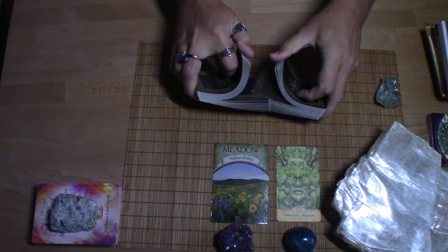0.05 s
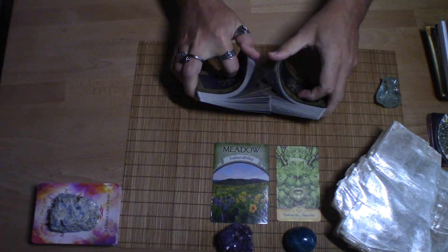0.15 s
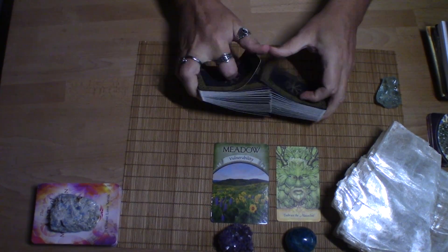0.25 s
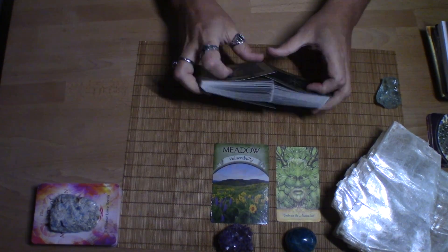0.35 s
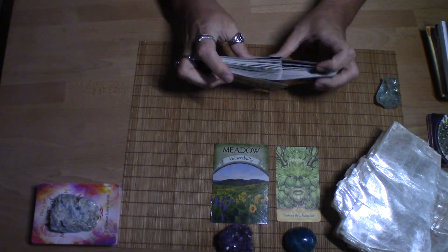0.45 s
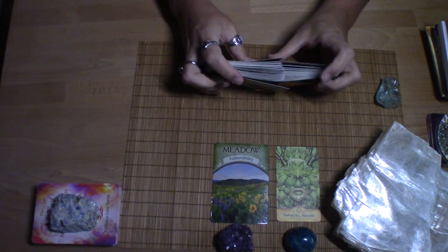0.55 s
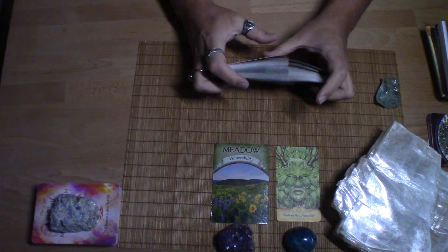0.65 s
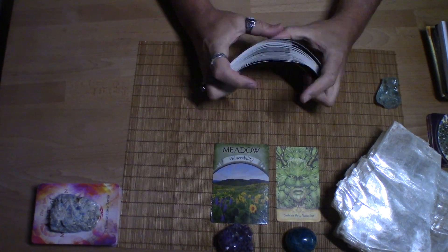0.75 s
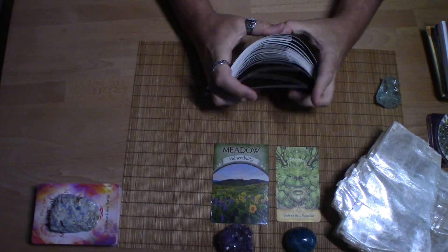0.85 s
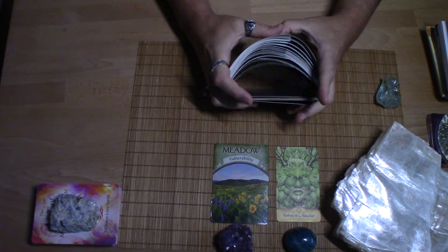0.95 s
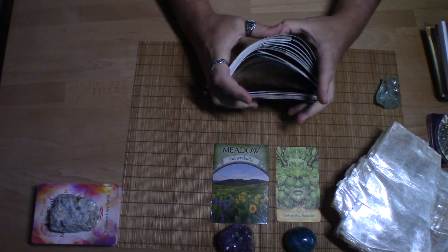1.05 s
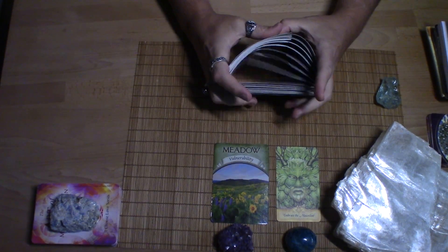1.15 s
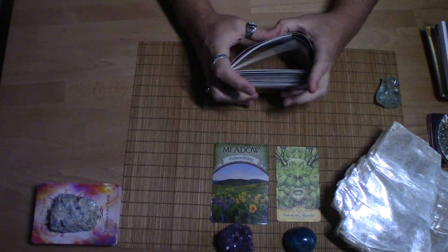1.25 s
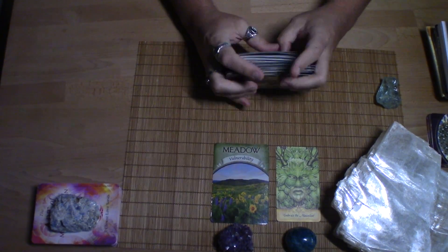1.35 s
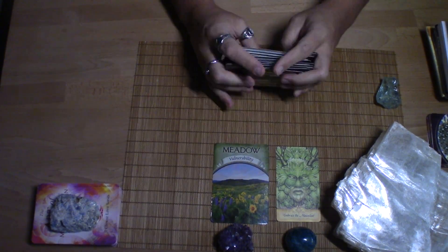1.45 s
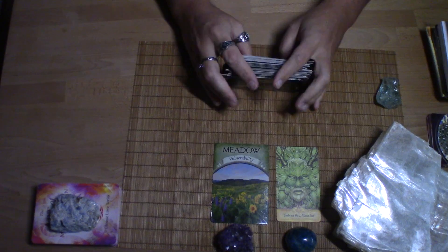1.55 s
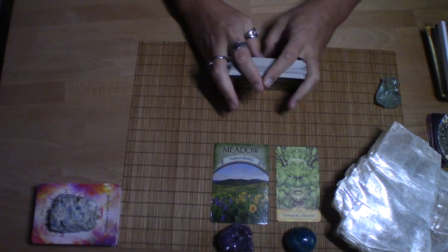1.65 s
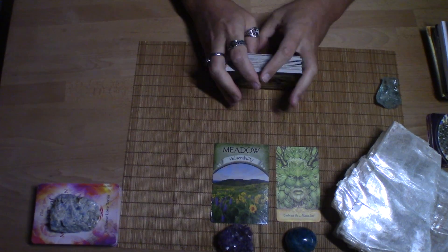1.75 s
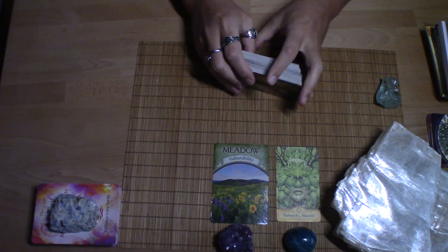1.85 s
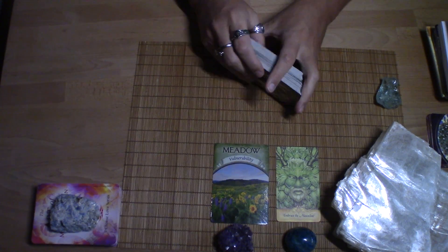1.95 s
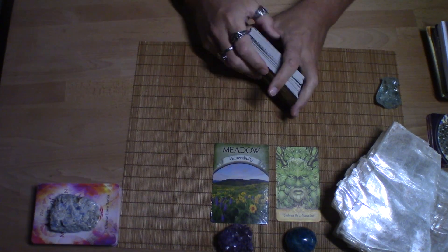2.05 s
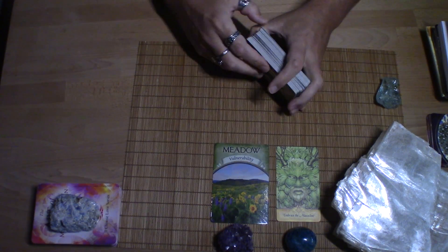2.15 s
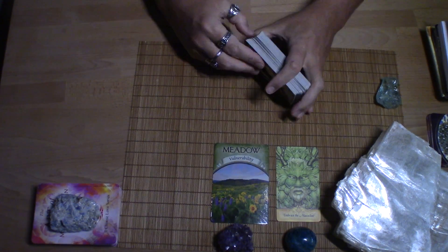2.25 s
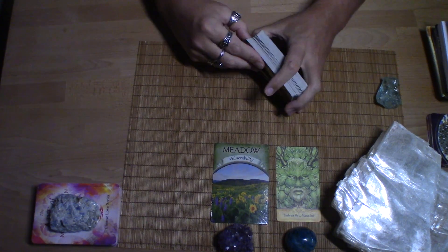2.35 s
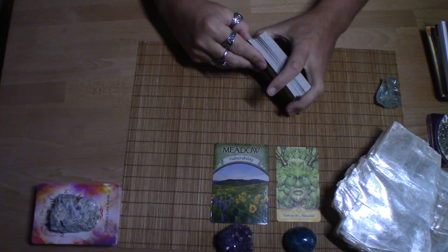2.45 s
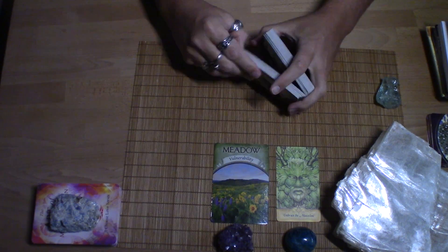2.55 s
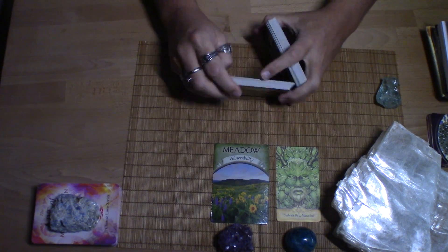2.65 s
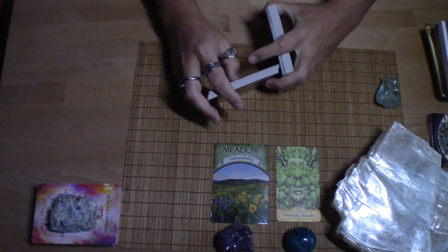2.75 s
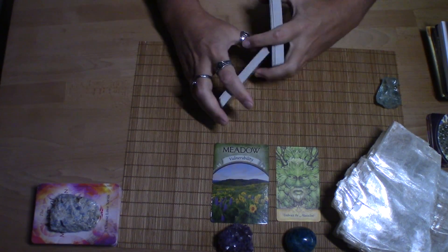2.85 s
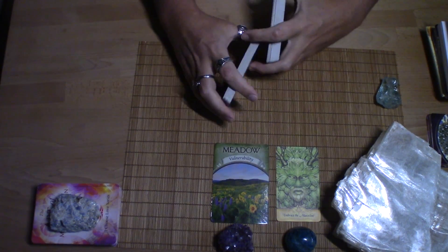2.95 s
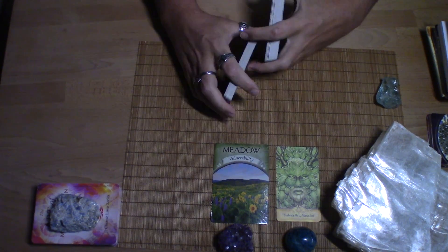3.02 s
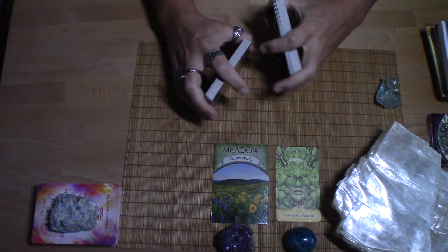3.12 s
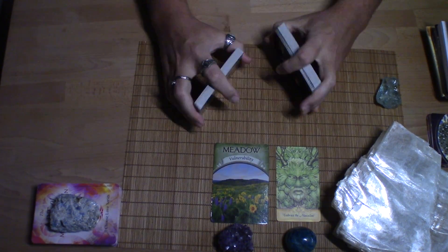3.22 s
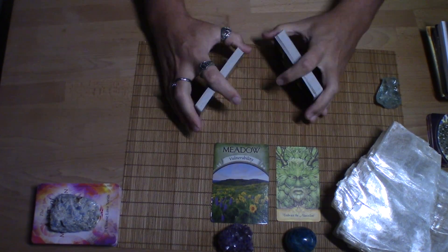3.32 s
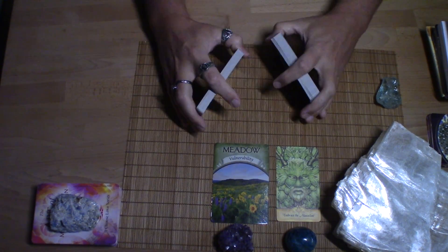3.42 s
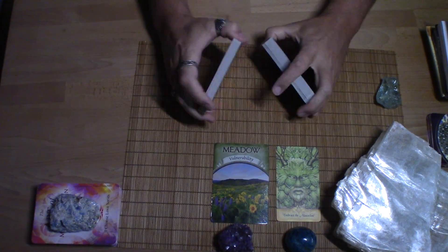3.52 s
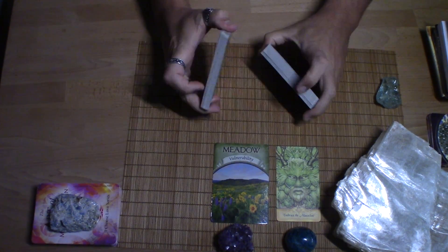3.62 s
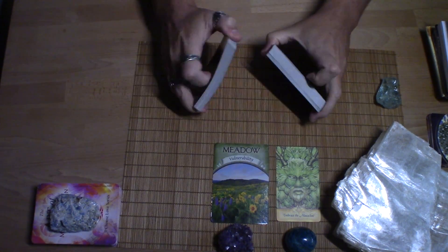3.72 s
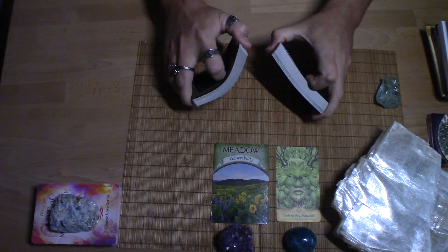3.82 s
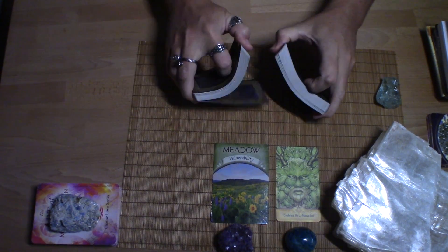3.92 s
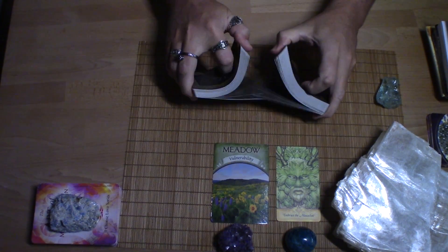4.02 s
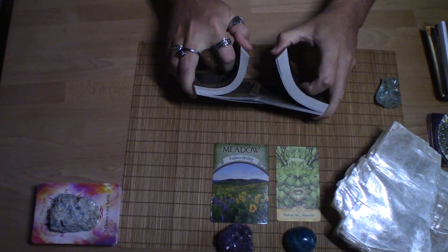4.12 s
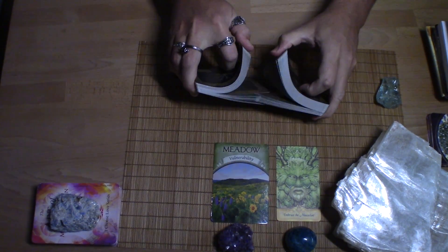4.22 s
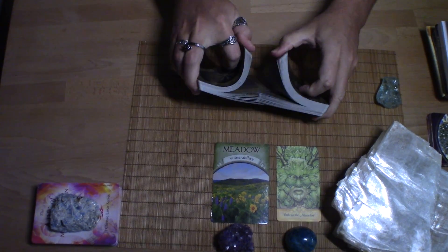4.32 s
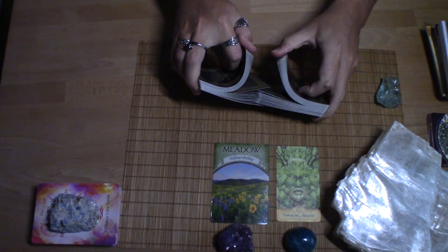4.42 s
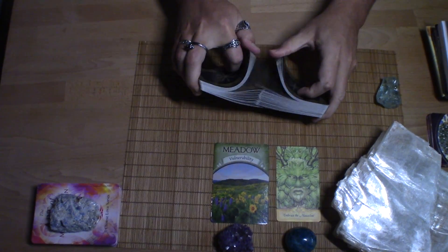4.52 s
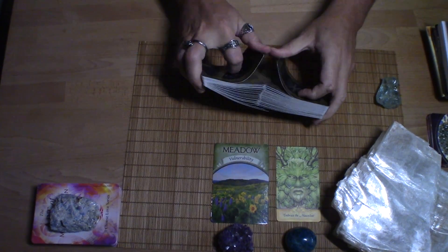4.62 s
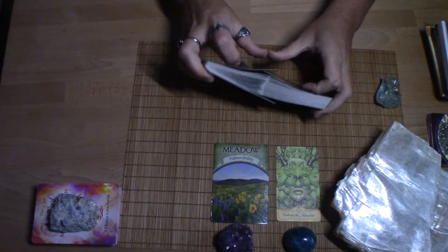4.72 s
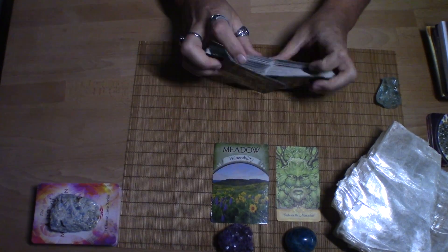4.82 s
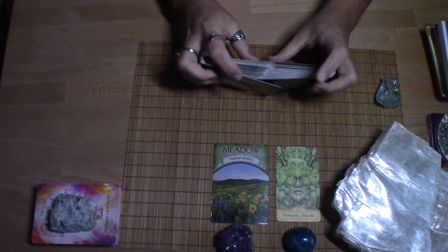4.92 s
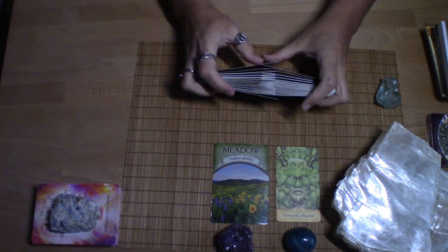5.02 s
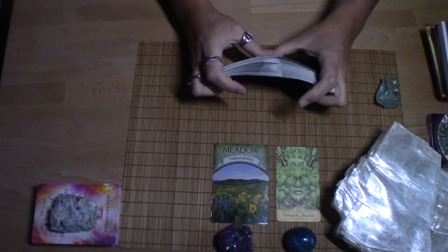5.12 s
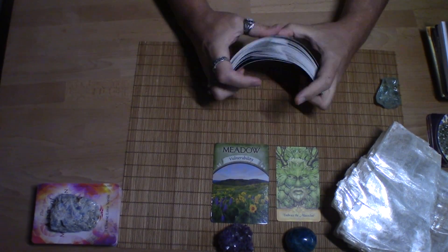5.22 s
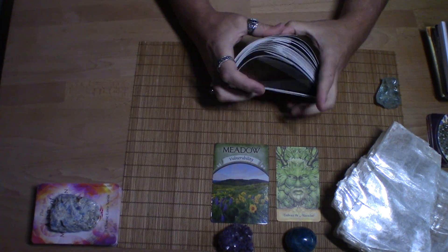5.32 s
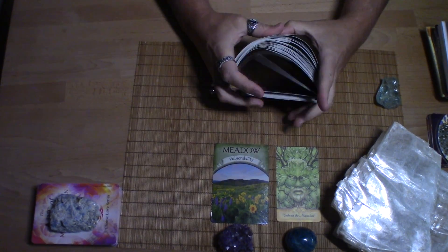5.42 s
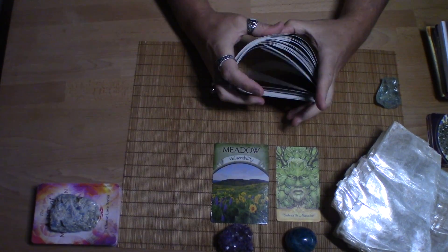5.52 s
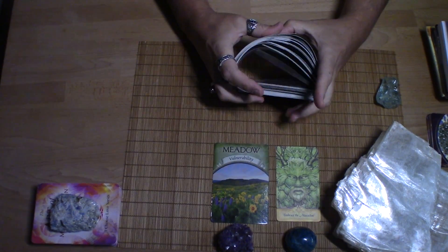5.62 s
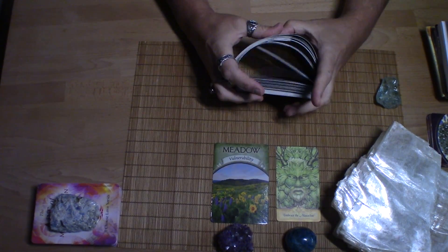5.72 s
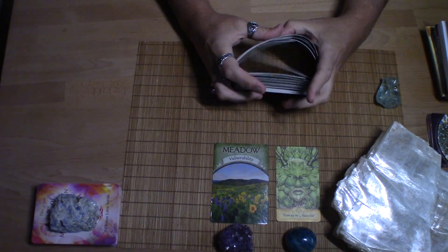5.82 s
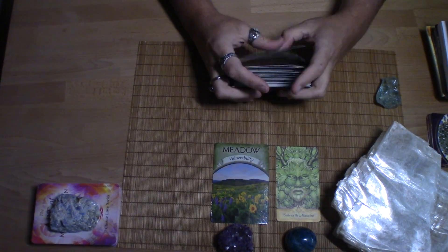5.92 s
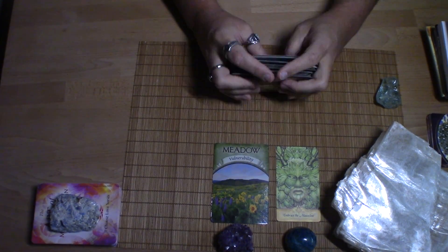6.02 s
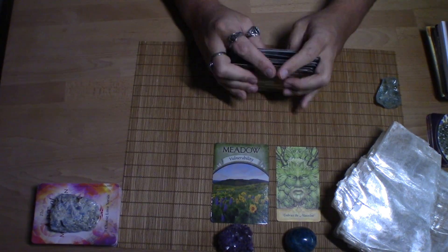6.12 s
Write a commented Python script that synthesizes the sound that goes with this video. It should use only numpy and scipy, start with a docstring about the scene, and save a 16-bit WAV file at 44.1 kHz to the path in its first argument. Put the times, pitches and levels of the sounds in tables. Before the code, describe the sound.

A stiff card deck riffles in a loud crackling flutter, cascades flat, gets squared with soft wooden knocks, then riffles and cascades again up close.

```python
"""A deck of stiff cards on a mat over a hollow wooden table: thumbs riffle two halves together, the bent
deck cascades flat in a bridge, then it is squared up with knocks, rubs and presses; riffle and bridge recur.
Snaps are noise bursts ringing card modes; sliding faces are shaped noise; edges and squeezed air are grains.
Knocks ring table modes over low rumble and room tone. The table top mirrors faces and snaps into a close
microphone, whose limiter holds the loud runs down."""
import sys
import numpy as np
from scipy import signal
from scipy.fft import rfft, irfft, next_fast_len
from scipy.io import wavfile
from scipy.ndimage import uniform_filter1d

SR = 44100
rng = np.random.default_rng(int(sys.argv[2]) if len(sys.argv) > 2 else 0)


def output_pcm(signal):
    """Save a mono or channel-first signal as 16-bit PCM at the path in sys.argv[1].

    Samples are clipped to [-1, 1] before scaling.
    """
    pcm = np.clip(np.atleast_2d(signal).T, -1, 1) * 32767
    wavfile.write(sys.argv[1], SR, np.round(pcm).astype(np.int16))


N = 272185
CONTROL_STEP = 32   # samples between points of the move envelopes

# Low rumble: t/s, rms level/dB
RUMBLE_LEVELS = [(0.0, -39), (0.41, -40), (1.2, -21), (1.22, -33), (2.32, -43), (2.52, -29), (3.14, -46),
                 (3.21, -36), (3.61, -48), (3.76, -24), (4.88, -37), (4.97, -55), (5.02, -25), (5.19, -45),
                 (5.38, -26), (5.81, -27), (6.1, -42), (6.17, -30)]
# Room tone spectrum: f/Hz, relative level per Hz/dB
ROOM_TONE_SPECTRUM = [(35, -46), (60, -24), (189, -2), (262, -12.5), (566, -15.5), (862, -16.5),
                      (1280, -14), (2710, -21.5), (11000, -23), (16000, -31)]
ROOM_TONE_RMS_DB = -48.0
# Room echo: decay of the lows, corner of the loss per round, gain
ROOM_T60_S, WALL_CORNER_HZ, ROOM_GAIN_DB = 0.2, 4200, -16.5
MIRROR_DELAY_S, MIRROR_GAIN = 0.000563, 0.11
# Table modes: f/Hz, relative level/dB, t60/s
TABLE_MODES = [(112.2, -7.5, 0.12), (176.6, -4.5, 0.21), (213.8, -6.5, 0.2), (269.5, -5.5, 0.068),
               (328, -8, 0.067), (414.4, -9, 0.056), (588, -12, 0.041)]
# Deck on table: t/s, relative strength/dB
TABLE_KNOCKS = [(0.437, -10.5), (0.618, -24), (0.754, -13), (1.436, -14), (1.464, -1.5), (1.496, -20),
                (1.623, -27), (1.671, -14), (1.753, -24), (1.819, -10), (2.716, 2), (2.738, -7),
                (2.805, -22), (3.219, 5), (3.242, 0), (3.275, -2), (3.965, -6), (4.879, -22), (4.913, -8.5),
                (5.001, -11), (5.033, -22), (6.145, -3.5)]

# Palms and deck press on the mat: t/s, swell/s per 20 dB, fade/s per 20 dB, relative level/dB
PRESS_MOVES = [(0.545, 0.13, .15, -26), (0.62, .015, 0.13, -19), (0.79, 0.18, 0.075, -21),
               (1.44, .01, .2, -23), (1.51, .1, .2, -17), (1.666, 0.17, 0.12, -15), (1.755, .01, .2, -25),
               (1.83, 0.19, .2, -14.5), (1.994, 0.35, 0.055, -19), (2.1, 0.085, 1, -32.5),
               (2.23, .03, .05, -33), (2.729, 0.023, 0.28, -14), (2.962, 0.26, 0.084, -26),
               (3.255, .06, .08, -12.5), (3.682, 0.048, 0.27, -31), (4.86, 0.088, 0.48, -26.5),
               (5.008, 0.057, 0.13, -17), (5.27, 0.018, .1, -30), (5.403, 0.095, 0.093, -16),
               (6.172, 0.018, .05, -12)]
# Fingertips rub along the card edges: t/s, swell/s per 20 dB, fade/s per 20 dB, relative level/dB
RUB_MOVES = [(2.3, .02, .2, -45), (2.63, .05, .06, -40), (2.84, .06, .05, -35), (2.97, .06, .07, -33),
             (3.53, .1, .09, -39), (3.7, .04, .12, -38), (5.04, .08, .08, -33), (5.17, .01, .4, -30)]
# Card faces slide over each other: t/s, swell/s per 20 dB, fade/s per 20 dB, relative level/dB
SLIDE_MOVES = [(0.43, 0.038, 0.07, -28), (0.555, 0.036, 0.14, -30.5), (0.63, .03, .1, -36),
               (0.695, .03, 0.045, -34.5), (0.745, .02, .05, -33), (0.801, 0.083, 0.33, -24),
               (0.88, 0.094, 0.04, -17), (1.666, 0.16, 0.032, -32), (1.9, 0.19, 0.21, -34.5),
               (1.994, 0.21, 0.072, -34.5), (2.06, .02, 0.32, -43.5), (2.752, .04, .1, -38),
               (3.055, .01, .03, -46), (3.245, .03, .08, -45), (2.962, 0.075, 0.12, -42),
               (3.44, .06, 0.16, -50), (3.512, .15, .14, -45.5), (3.898, .003, .02, -28),
               (4.707, .004, .09, -17), (4.816, .005, 0.052, -30), (4.98, 0.15, 0.35, -38.5),
               (5.257, 0.067, 0.044, -23), (6.002, .03, .1, -33.5), (6.125, 0.077, 0.074, -43)]
# Several cards drop together: t/s, swell/s per 20 dB, fade/s per 20 dB, relative level/dB
CLUMP_MOVES = [(0.028, .04, .05, -11.5), (0.9, 0.013, 0.64, -19), (1.145, .03, .1, -14),
               (1.24, .2, 0.067, -15), (1.339, 0.036, 0.072, -17), (1.516, .07, 0.074, -16.5),
               (1.67, .05, .05, -24), (1.825, .06, .08, -24), (2.46, .015, 0.046, -40.5),
               (2.718, .005, .06, -26), (3.245, .03, .07, -30), (3.921, .006, .04, -8),
               (3.972, .03, .05, -11), (4.0, .04, 0.38, -15), (4.527, 0.32, 0.09, -11.5),
               (5.402, 0.096, 0.12, -11.5), (5.869, 0.12, 0.04, -11.5), (5.95, 0.027, 0.068, -20.5),
               (6.148, .004, .1, -18), (6.165, .03, .1, -11)]
# The bent deck cascades flat: start/s, end/s, relative level/dB
BRIDGE_RUNS = [(0.889, 1.341, -13), (5.28, 5.949, -12)]
# Thumbs let the two halves run together: start/s, end/s, relative level/dB
RIFFLE_RUNS = [(-0.05, 0.323, -17.8), (3.96, 4.70, -19.3)]
# Swell and fade times, per 20 dB
BRIDGE_RISE_S, BRIDGE_FALL_S = 0.0079, 0.048
RIFFLE_RISE_S, RIFFLE_FALL_S = 0.035, 0.079
# Drive over the move's level: (sliding hiss, edge flutter, squeezed air, shaken table)
PRESS_MIX_DB = (-23, -13, -9, -1)
RUB_MIX_DB = (-16, 3, -13, -13)
SLIDE_MIX_DB = (1, -4.5, -19, -11)
CLUMP_MIX_DB = (-15.5, 0, 3, -8.5)
BRIDGE_MIX_DB = (-0.5, -9.5, -9.5, -13)
RIFFLE_MIX_DB = (-0.5, 3, -4, -8)

# Squeezed air spectrum: f/Hz, relative level per Hz/dB
AIR_SPECTRUM = [(150, -6), (270, -0.5), (350, 7), (450, -3), (600, 1.5), (750, -3.5), (950, -20.5),
                (1400, -30)]
# Edge flutter spectrum: f/Hz, relative level per Hz/dB
FLUTTER_SPECTRUM = [(700, -6.5), (1000, -4), (1250, 3), (1700, 4.5), (2400, 2), (3300, 1), (4500, -6),
                    (9000, -30), (15000, -50)]
# Sliding hiss spectrum: f/Hz, relative level per Hz/dB
SLIDE_SPECTRUM = [(1760, -17), (3000, -5), (5560, -1.5), (6620, 0.5), (8280, -2), (11800, -2),
                  (14500, -12.5), (16000, -23)]
# Card modes: multiple of slap pitch, relative level/dB, t60/s
CARD_MODES = [(1, 8.5, 0.0092), (1.32, -5, 0.0086), (.76, -10, 0.0047), (1.9, -10, 0.0058)]
# Clearest card corners snapping: t/s, relative slap level/dB, slap f/Hz, relative bright crack level/dB
CLEAR_SNAPS = [(0.023, 2, 2890, -3), (0.0438, 6, 2870, -6), (0.0581, 0, 1700, -16), (0.0847, 9, 1810, -1),
               (0.0901, 5, 1680, -32), (0.1137, 0.5, 3020, -14), (0.1258, 0, 1780, -20),
               (0.136, 7, 4560, -1), (0.1547, 3, 2800, -5), (0.1648, 4, 3030, -3), (0.178, -4, 1680, -8),
               (0.196, -7, 1860, -14), (0.2244, -8, 1530, -11), (0.2476, -3.5, 2150, -8),
               (0.2584, -2, 3030, -12), (0.2775, 3, 2850, -2), (0.4219, -10.5, 2940, -16),
               (0.429, -8, 3150, -11), (0.4454, -14, 2840, -20), (0.615, -16, 1270, -39),
               (0.636, -16, 1620, -47), (0.9021, -3, 1510, -10), (1.012, -4, 1720, -14),
               (1.0442, 3.5, 4150, -7), (1.1074, -5, 1710, -8), (1.1378, 5, 1340, -32),
               (1.187, 5.5, 1540, -10), (1.2005, -2, 1860, -26), (1.2201, 7, 2080, -18),
               (1.2365, 6, 1580, -11), (1.2494, 4.5, 1460, -12), (1.2803, 6.5, 1570, -10),
               (1.4636, -13, 1220, -45), (1.4985, 0.5, 1770, -39), (1.5408, -9, 1970, -44),
               (1.6683, -8.5, 1150, -30), (1.8197, -8.5, 1230, -50), (2.2775, -26, 3930, -48),
               (2.7176, -18, 1860, -37), (2.7567, -15, 1560, -23), (3.1753, -38, 3500, -38),
               (3.243, -15.5, 1540, -40), (3.898, -11, 1280, -18.5), (3.9169, 10, 1630, -14),
               (3.9482, -8, 1240, -14), (3.9688, 4, 1590, -27), (3.9751, 5, 1270, -6), (3.9908, 0, 1700, 1),
               (4.0235, 8, 3300, -6), (4.0604, -9, 1610, -5.5), (4.0954, 5, 2760, -3), (4.117, 0, 1760, -5),
               (4.1264, -7, 2210, -6.5), (4.1554, 6, 1760, -4), (4.1764, -10, 1930, -7),
               (4.1926, -6, 3040, -7), (4.227, 1, 1700, -9.5), (4.2444, 0, 1590, -3),
               (4.255, -0.5, 2960, -7), (4.2802, -11, 2900, -12), (4.2926, -11, 1560, 0),
               (4.331, 2, 1770, -7), (4.3714, -3, 4250, -7), (4.3768, 5, 3380, -6), (4.4084, 3, 1940, 0.5),
               (4.4484, 3, 1610, -6), (4.464, 2, 1800, -4.5), (4.485, 1.5, 1620, -12),
               (4.5192, -3, 1830, -9), (4.5314, -4, 1480, -10), (4.5404, -2, 1790, -7),
               (4.5592, -2, 3140, -2), (4.586, -8, 1660, -9), (4.6293, -2, 1820, -2.5),
               (4.6588, 2, 4400, -10), (4.6644, 4.5, 2180, -4), (4.7055, 3, 1780, -1),
               (4.7654, -21, 4100, -18), (4.816, -11, 3230, -21), (5.1026, -21.5, 1700, -28),
               (5.1683, -4, 1380, -41), (5.199, -4, 1510, -40), (5.227, -7, 1380, -56),
               (5.3161, -5.5, 1870, -6.5), (5.3424, -5, 1740, -4), (5.3655, 5, 1270, -23),
               (5.3754, 7.5, 1780, 1), (5.3986, -3.5, 1780, -5), (5.4286, -5, 1700, -3),
               (5.472, -1, 1520, -5), (5.4784, 2.5, 2250, -27), (5.5796, 3.5, 2200, -7),
               (5.6516, -2, 1790, -20), (5.659, 3, 1880, -16), (5.7034, -0.5, 2320, -26),
               (5.7331, 1, 1330, -20), (5.7774, 0, 1900, -22), (5.8304, 7, 1720, -19),
               (5.8454, -2, 1200, -20), (5.8624, 12, 1840, -17), (5.886, 8, 2080, -10),
               (5.9407, -6, 2500, 0.5), (6.008, -13.5, 4220, -18), (6.148, -4, 1780, -39),
               (6.157, 0, 1810, -39)]
CRACKLE_T60_S = 0.011
# Weaker snaps: count per riffle, relative levels, spread either way, pitch range
LESSER_COUNTS = (3, 9)
LESSER_SLAP_DB, LESSER_CRACK_DB, LESSER_SPREAD_DB = -5.5, -8, 7
LESSER_LOW_HZ, LESSER_HIGH_HZ = 1520, 2950
# Air push: drive over the air level, dB added per dB of slap, standard deviation
PUSH_DRIVE_DB, PUSH_PER_SLAP_DB, PUSH_SPREAD_DB = 14.0, 0.25, 3

# Limiter: threshold, dB taken off per dB over, gain recovery; then hard ceiling and top cut
LIMIT_DB, LIMIT_SLOPE, RELEASE_DB_PER_S = -2.5, 0.6, 187.2
CEILING, CUTOFF_HZ = 0.84, 16300


def amp(db):
    """dB to gain."""
    return 10 ** (np.asarray(db) / 20)


def rms_one(x):
    """Scale to rms 1."""
    return x / np.sqrt(np.mean(x ** 2) + 1e-20)


def band(x, low_hz, high_hz):
    """Band-pass."""
    return signal.sosfilt(signal.butter(2, [low_hz, high_hz], "band", fs=SR, output="sos"), x)


def coloured(x, spectrum):
    """Shape a noise by a spectrum, interpolated over log frequency; rms 1."""
    size = next_fast_len(N)
    hz, db = np.transpose(spectrum)
    grid_hz = np.fft.rfftfreq(size, 1 / SR) + 1   # +1 avoids log(0)
    gain = amp(np.interp(np.log(grid_hz), np.log(hz), db))
    return rms_one(irfft(rfft(x, size) * gain, size)[:N])


def spikes(times_s, db):
    """One sample of the given height at each time."""
    out = np.full(N, 1e-18)
    np.add.at(out, np.minimum((times_s * SR).astype(int), N - 1), amp(db))
    return out


def dying(clicks, t60_s):
    """Each click becomes an exponential envelope."""
    return signal.lfilter([1], [1, -amp(-60 / (t60_s * SR))], clicks)


def ring(force, hz, t60_s):
    """Damped resonator: a unit click sets a sine of height 1 ringing."""
    r = amp(-60 / (t60_s * SR))
    w = 2 * np.pi * hz / SR
    return signal.lfilter([0, np.sin(w)], [1, -2 * r * np.cos(w), r * r], force)


def grains(per_s, spread_db):
    """Random tiny contacts of uneven size and random sign."""
    size_db = spread_db * np.minimum(rng.exponential(1, N), 5)
    sizes = amp(size_db) * rng.choice([-1, 1], N)
    return sizes * (rng.random(N) < per_s / SR)


def slips(per_s, t60_s, steady):
    """Loudness of a stick-slip contact: sudden jumps die away over a steady part; rms 1."""
    jumps = dying(np.abs(grains(per_s, spread_db=2.5)), t60_s)
    return rms_one(steady + rms_one(jumps))


def room_tone():
    """Steady noise of the room, shaped by its spectrum."""
    return amp(ROOM_TONE_RMS_DB) * coloured(rng.standard_normal(N), ROOM_TONE_SPECTRUM)


def low_rumble():
    """Noise at 12-65 Hz whose level follows its table."""
    level_db = np.interp(np.arange(N) / SR, *np.transpose(RUMBLE_LEVELS))
    return amp(level_db) * rms_one(band(rng.standard_normal(N), 12.0, 65))


def room(x):
    """Ten feedback delays, duller on every round."""
    size = next_fast_len(N + SR)
    w = 2 * np.pi * np.fft.rfftfreq(size)
    dull = 1 / (1 + 1j * w * SR / (2 * np.pi * WALL_CORNER_HZ)) ** 0.77
    answer = 0
    for k, lag_s in enumerate(np.geomspace(0.011, 0.037, num=10)):
        loop = amp(-60 * lag_s / ROOM_T60_S) * dull * np.exp(-1j * w * round(lag_s * SR))
        answer = answer + (-1) ** k * loop / (1 - loop)
    return irfft(rfft(x, size) * answer, size)[:N]


def mirror(x):
    """The table top sends a second copy just behind the first, hollowing the odd half-wave pitches."""
    lagged = np.arange(N) - MIRROR_DELAY_S * SR
    copy = np.interp(lagged, np.arange(N), x, left=0)
    return (x + MIRROR_GAIN * copy) / np.hypot(1, MIRROR_GAIN)


def table(shaken_db):
    """Knocks strike the table's modes; dragged cards and palms keep them trembling."""
    s, knock_db = np.transpose(TABLE_KNOCKS)
    luck_db = 0.6 * rng.standard_normal((len(s), len(TABLE_MODES)))
    bumps = grains(600, spread_db=1.5)
    struck = trembling = 0
    for k, (hz, db, t60_s) in enumerate(TABLE_MODES):
        struck = struck + ring(spikes(s, knock_db + db - 7.0 + luck_db[:, k]), hz, t60_s)
        trembling = trembling + (-1) ** k * amp(db) * ring(bumps, hz, t60_s)
    return band(struck, 127, 920) + amp(shaken_db - 1.0) * rms_one(trembling)


def swell(start_s, end_s, rise_s, fall_s, db):
    """Power of one move: swells, holds from start to end, fades."""
    t = np.arange(0, N + CONTROL_STEP, CONTROL_STEP) / SR
    before_db = 20 * np.maximum((start_s - t) / max(rise_s, 0.002), 0)
    after_db = 20 * np.maximum((t - end_s) / max(fall_s, 0.01), 0)
    return amp(2 * (db - before_db - after_db))   # doubled dB: power


def hands():
    """Every move drives hiss, flutter, air and table in the proportions of its kind; dB per sample."""
    bridges = [(a, b, BRIDGE_RISE_S, BRIDGE_FALL_S, db) for a, b, db in BRIDGE_RUNS]
    riffles = [(a, b, RIFFLE_RISE_S, RIFFLE_FALL_S, db) for a, b, db in RIFFLE_RUNS]
    kinds = [(BRIDGE_MIX_DB, bridges), (RIFFLE_MIX_DB, riffles)]
    for mix_db, rows in [(PRESS_MIX_DB, PRESS_MOVES), (RUB_MIX_DB, RUB_MOVES),
                         (SLIDE_MIX_DB, SLIDE_MOVES), (CLUMP_MIX_DB, CLUMP_MOVES)]:
        kinds.append((mix_db, [(s, s, *rest) for s, *rest in rows]))   # no hold
    power = 0
    for mix_db, moves in kinds:
        power = power + np.outer(amp(mix_db) ** 2, sum(swell(*move) for move in moves))
    at = np.arange(N) / CONTROL_STEP
    return [np.interp(at, np.arange(len(p)), 10 * np.log10(p + 1e-9)) for p in power]


def air_puffs(air_db):
    """Air puffs out between the cards: sparse grains, shaped low."""
    return coloured(grains(500, spread_db=3.5), AIR_SPECTRUM) * amp(air_db - 3.5)


def edge_flutter(flutter_db):
    """Card edges tick past each other: dense grains under stick-slip, duller when weak."""
    patter = coloured(grains(6000, spread_db=2.5), FLUTTER_SPECTRUM)
    patter = patter * slips(110, t60_s=0.026, steady=1.3)
    treble_gain = amp(0.28 * np.minimum(flutter_db + 10.5, 0))
    patter += band(patter, 1660, 15000) * (treble_gain - 1)
    return patter * amp(flutter_db - 2.5)


def sliding_hiss(hiss_db):
    """Card faces hiss as they slide: noise under stick-slip, duller when gentle."""
    hiss = coloured(rng.standard_normal(N), SLIDE_SPECTRUM) * slips(120, t60_s=0.077, steady=0.83)
    treble_gain = amp(0.27 * np.minimum(hiss_db + 24, 0))
    hiss += band(hiss, 5500, 22000) * (treble_gain - 1)
    return hiss * amp(hiss_db + 0.5)


def lesser_snaps():
    """Between the clear snaps of a riffle weaker corners let go at random."""
    rows = []
    for (start_s, end_s, _), count in zip(RIFFLE_RUNS, LESSER_COUNTS):
        for when, size, pitch, edge in rng.random((count, 4)):
            s = max(start_s + when * (end_s - start_s), 0)
            slap_db = LESSER_SLAP_DB + LESSER_SPREAD_DB * (2 * size - 1)
            slap_hz = LESSER_LOW_HZ * (LESSER_HIGH_HZ / LESSER_LOW_HZ) ** pitch ** 2   # favours low
            crack_db = LESSER_CRACK_DB + LESSER_SPREAD_DB * (2 * edge - 1)
            rows.append((s, slap_db, slap_hz, crack_db))
    return rows


def cracks(s, crack_db):
    """Bright noise bursts; a weaker, longer tail is the card still buzzing."""
    noise = rms_one(band(rng.standard_normal(N), 2940, 10640))
    burst = dying(spikes(s, crack_db + 3.5), 0.0092)
    buzz = dying(spikes(s, crack_db - 13.5), 0.043)
    return noise * (burst + buzz)


def slaps(s, slap_db, slap_hz):
    """A few ms of crackle rings the card's modes."""
    span = 1500   # samples
    decay = amp(-60 * np.arange(span) / SR / CRACKLE_T60_S)
    crackle = rng.standard_normal((len(s), span)) * decay
    crackle[:, 0] = 3 * np.sign(crackle[:, 0])   # the corner lets go with one sharp step
    out = np.zeros(N + span)
    for at, db, hz, force in zip((s * SR).astype(int), slap_db, slap_hz, crackle):
        slap = sum(amp(mode_db) * ring(force, k * hz, t60_s) for k, mode_db, t60_s in CARD_MODES)
        out[at:at + span] += amp(db + 1.0) * slap / np.abs(slap).max()
    return band(out[:N], 1120, 6200)


def air_pushes(s, slap_db, air_db):
    """Each snap pushes squeezed air: a click rounded by the air cushion, rung at 509 Hz."""
    luck_db = PUSH_SPREAD_DB * rng.standard_normal(len(s))
    push_db = air_db[(s * SR).astype(int)] + PUSH_DRIVE_DB + PUSH_PER_SLAP_DB * slap_db + luck_db
    return ring(band(spikes(s, push_db), 65, 2600), 509, 0.014)


def snaps(air_db):
    """A corner snap is a bright crack, a ringing slap and a push of air."""
    s, slap_db, slap_hz, crack_db = np.transpose(CLEAR_SNAPS + lesser_snaps())
    return cracks(s, crack_db) + slaps(s, slap_db, slap_hz) + air_pushes(s, slap_db, air_db)


def scene():
    """Room tone, rumble, table and cards; only faces, edges and snaps reach mirror and room."""
    hiss_db, flutter_db, air_db, shaken_db = hands()
    background = room_tone() + low_rumble()
    cards = mirror(sliding_hiss(hiss_db) + edge_flutter(flutter_db) + snaps(air_db))
    echo = amp(ROOM_GAIN_DB) * room(cards)
    return (background + table(shaken_db) + air_puffs(air_db) + echo + cards)[None]


def record(dry):
    """A look-ahead limiter ducks just before peaks, a hard ceiling flattens the rest, the top is cut."""
    over_db = np.maximum(20 * np.log10(np.abs(dry[0]) + 1e-9) - LIMIT_DB, 0)
    ramp_db = RELEASE_DB_PER_S * np.arange(N) / SR
    held_db = np.maximum.accumulate(LIMIT_SLOPE * over_db + ramp_db) - ramp_db   # linear release in dB
    ahead_db = uniform_filter1d(np.append(held_db[66:], np.zeros(66)), size=133)   # 3 ms ahead
    limited = np.clip(dry * amp(-ahead_db), -CEILING, CEILING)
    return signal.sosfilt(signal.cheby2(14, 70, CUTOFF_HZ, fs=SR, output="sos"), limited)


dry = scene()
out = record(dry)
output_pcm(out)
```